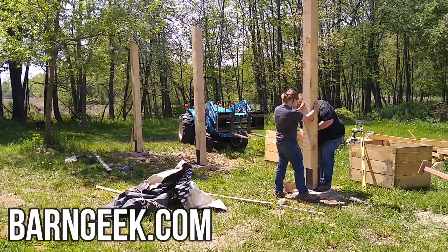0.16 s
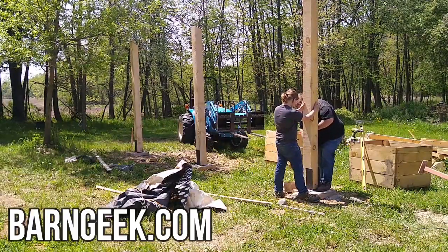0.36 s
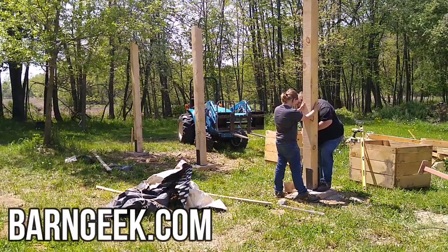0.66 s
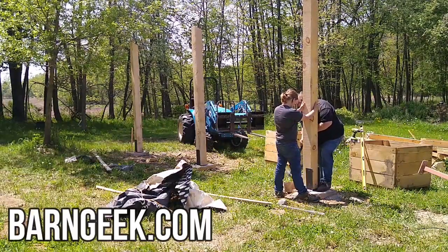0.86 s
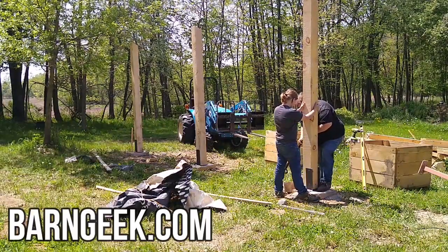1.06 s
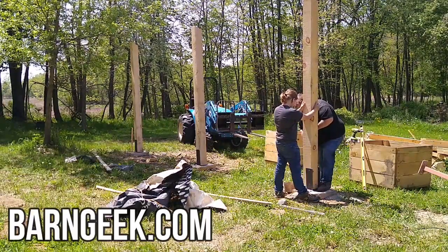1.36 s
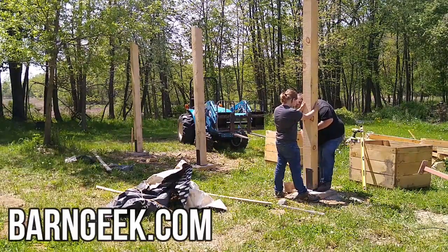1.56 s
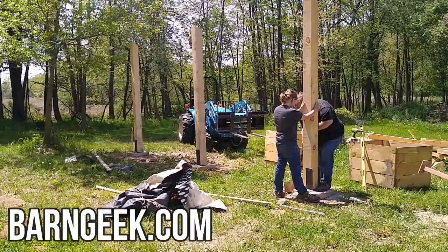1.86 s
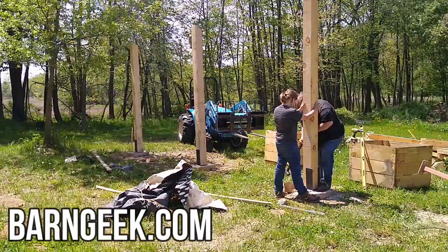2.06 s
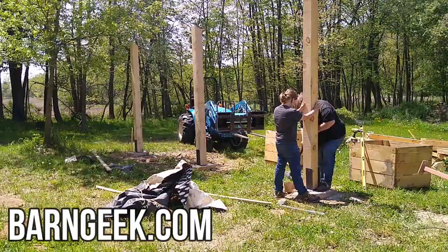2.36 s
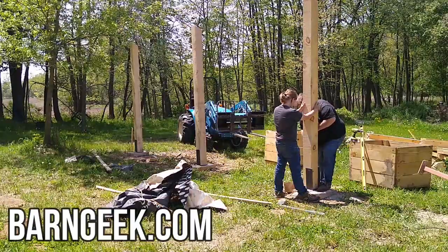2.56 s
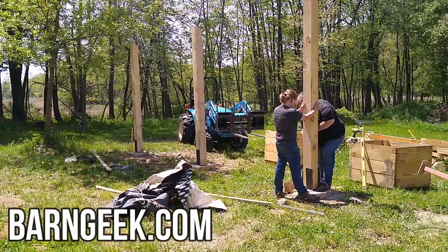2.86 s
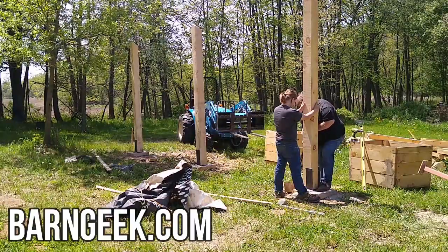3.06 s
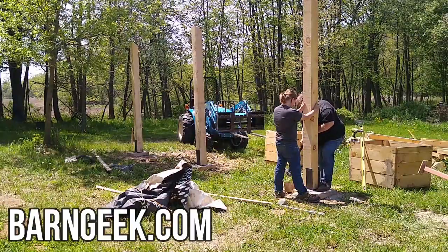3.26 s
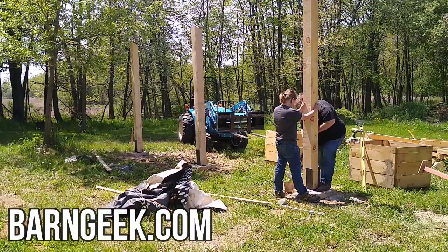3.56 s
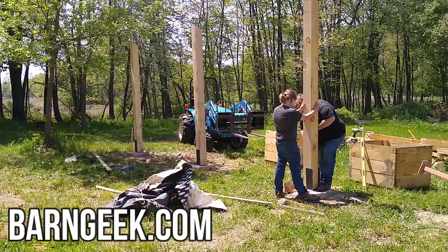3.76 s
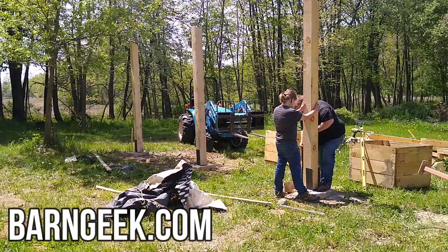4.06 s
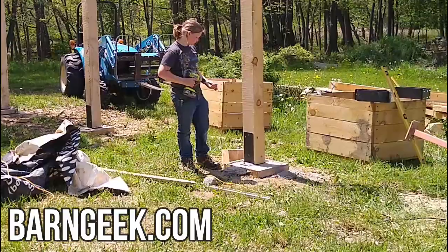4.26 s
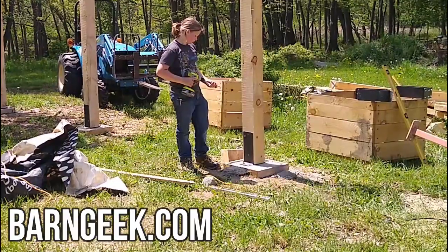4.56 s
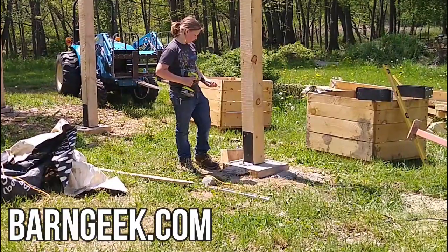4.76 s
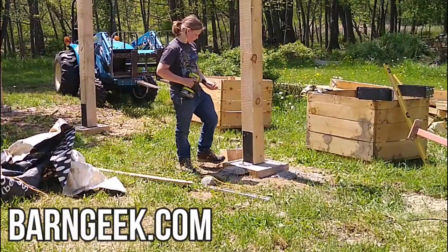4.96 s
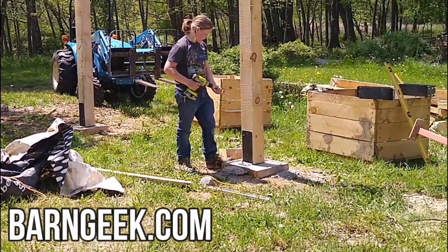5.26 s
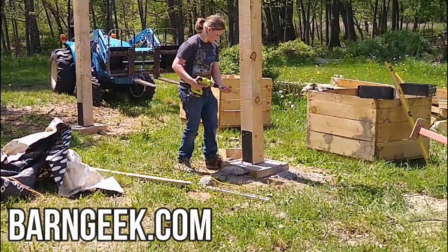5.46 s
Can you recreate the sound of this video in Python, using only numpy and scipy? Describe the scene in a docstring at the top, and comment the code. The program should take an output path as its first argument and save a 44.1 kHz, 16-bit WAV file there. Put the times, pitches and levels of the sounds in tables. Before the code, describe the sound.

Four loud, single hammer knocks on a thick wooden post, evenly spaced, each short and hard with a woody ring, bright steel edge and scattered woodland reverberation. Between them are faint wind, small gusts, a soft footfall or two and barely audible bird twitters. Just after four seconds an edit drops the hammering tail and breeze; quiet steady air remains, with repeated high bird phrases, lower rising whistles and tiny grass rustles, heard in open stereo.

```python
"""Hammering on a timber post in a clearing

Four steel blows excite post modes, dense timber modes, steel clusters and a noisy contact; scattered
paths return them from ground, lumber and trees, and a low boom lingers. Wind is coloured noise with gusts.
A cut at 4.205 s replaces hammering and breeze with calmer air. Birds, mostly after it, sing as gliding
sines; feet are swells of low noise (thuds) and treble noise (grass).
"""
import sys
import numpy as np
from scipy import signal
from scipy.fft import rfft, irfft, next_fast_len
from scipy.io import wavfile
from scipy.ndimage import map_coordinates

SR = 44100
rng = np.random.default_rng(int(sys.argv[2]) if len(sys.argv) > 2 else 0)


def master(y):
    """Save y as 16-bit WAV."""
    cut = np.clip(np.atleast_2d(y).T, -1, 1)
    pcm = np.round(cut * 32767)  # scale
    wavfile.write(sys.argv[1], SR, pcm.astype(np.int16))


N = 248283  # length in samples
CUT_S, TOP_HZ = 4.205, 16000  # moment of the cut; band limit of the microphone

# Spectra of the air. Each row: frequency in Hz, relative density in dB per Hz.
RUMBLE_SPECTRUM = [(20, -28), (35, -17), (53, 5.5), (75, -4), (100, -5.5), (150, -19.5), (300, -37),
                   (800, -72)]
BUFFET_SPECTRUM = [(25, -32), (52, 2.5), (80, -3), (130, -8.5), (270, -32), (1000, -72.5)]
BREEZE_SPECTRUM = [(76, -35.5), (130, -9.5), (176, -13), (263, -10.5), (780, -12.5), (1610, -17.5),
                   (3750, -28), (5390, -32), (5850, -34), (7600, -38.5), (14800, -36.5), (16000, -50)]
CALM_SPECTRUM = [(70, -32), (130, -6.5), (500, -8.5), (1220, -16), (2140, -15), (3260, -16.5), (6200, -24),
                 (8200, -27), (12500, -24.5), (15800, -24.5)]
# Likeness of the two channels in diffuse sound. Each row: frequency in Hz, correlation from -1 to 1.
LEFT_RIGHT_LIKENESS = [(60, 0.33), (130, 0.27), (290, 0.94), (640, 0.22), (1400, -0.21), (3000, 0)]
# Gusts that buffet the microphone. Each row: centre in seconds, level in dB, length in seconds.
GUSTS = [(0.11, -53.5, 0.088), (1.032, -52.5, 0.065), (1.175, -49.5, 0.062)]
# Wind slackens steadily up to the cut and stays low after it.
WIND_DB, SLACKEN_DB_PER_S, CALM_WIND_DB = -55, 1.3, -69.5
BREEZE_DB, BREEZE_FALL_DB_PER_S, GUST_STIR_DB = -65.5, .5, 2.5  # a gust stirs the foliage

# Thuds of feet. Each row: centre in seconds, relative level in dB, length in seconds, top in Hz.
FOOT_THUDS = [(1.212, -47.5, 0.0054, 242), (2.024, -51, 0.011, 165), (4.722, -61, 0.0094, 300),
              (4.739, -66, 0.025, 950), (5.059, -55.5, 0.015, 78.4)]
# Grass brushed by boots. Each row: centre in seconds, relative level in dB, length in seconds.
GRASS_SWISHES = [(1.188, -81, 0.07), (4.434, -77.5, 0.055), (4.584, -74, 0.033), (4.718, -71.5, 0.027),
                 (4.709, -68, 0.0042), (5.267, -64.5, 0.0014), (5.293, -75, 0.016)]
# Spectrum of brushed grass. Each row: frequency in Hz, relative density in dB per Hz.
GRASS_SPECTRUM = [(800, -21), (3000, 0.5), (6000, 1), (9000, -5), (12000, 9.5), (16000, -5.5)]

# Notes of each bird call. Each row: delay into the call in seconds, length in seconds, start in Hz,
# end in Hz, bend of the glide, loudest point from 0 to 1, relative level in dB.
PHRASE_NOTES = [(0, .014, 5800, 8100, 0.54, 0.3, -11), (.04, .044, 8050, 5100, -1.3, 0.79, 4),
                (.095, .038, 4600, 3480, -1.2, .5, -3)]
CHIP_NOTES = [(0.0007, 0.022, 4600, 3900, 1.8, .45, 0)]
FALL_NOTES = [(0, .035, 5550, 3850, -.8, 0.23, 0)]
TWITTER_NOTES = [(0, .03, 5530, 4497, 7.5, .45, 0), (.088, .024, 4000, 5000, -2.5, .6, -1)]
RISE_NOTES = [(0, .07, 1640, 3500, 3.2, 0.85, 0)]
WHISTLE_NOTES = [(0, 0.052, 2260, 2150, -2, .2, 0.0051)]
# Scattered calls. Each row: start in seconds, relative level in dB.
CHIP_CALLS = [(4.355, -81), (4.39, -79), (4.428, -74), (4.872, -78), (4.907, -80), (5.614, -73)]
FALL_CALLS = [(4.255, -78), (4.366, -78), (4.588, -79), (4.815, -77)]
TWITTER_CALLS = [(2.162, -76), (2.523, -74.5)]
WHISTLE_CALLS = [(4.201, -73)]
# Runs of the high bird's phrase and the low bird's rising note. Each entry: start in seconds.
PHRASE_STARTS = [4.215, 4.389, 4.572, 4.767, 4.950, 5.127, 5.303, 5.479]
RISE_STARTS = [4.412, 4.597, 4.759, 4.917, 5.078, 5.235, 5.382, 5.539]
PHRASE_DB, PHRASE_SOFTER_DB = -68.5, 13  # full voice; how much softer the run begins
RISE_DB, RISE_SOFTER_DB = -73, 2.5
SWELL_S = 0.36  # time constant of the growth to full voice
WAVER, FLUTTER_DB = 0.011, 3.5  # unsteadiness of pitch (fraction) and of level
NOTE_FULLNESS = 0.59  # exponent of a note's rise and fall

# Hammer blows. Each row: start in seconds, level in dB, relative steel level in dB, relative contact tick
# level in dB, brightness in dB per octave, frequencies in Hz favoured and starved by the spot that is hit.
BLOWS = [(.415, -1.84, -4, -9.5, -0.13, 1060, 361), (1.5653, -0.6, -1, -5, 0.36, 1400, 390.3),
         (2.700, -0.34, -3, 3, 0, 500, 794), (3.879, -1.3, 0, -10, 0.67, 735, 251.6)]
# Modes of the post. Each row: frequency in Hz, relative level in dB, T60 in seconds.
POST_MODES = [(131.2, -20.5, 0.16), (198.4, -35, 0.22), (229.6, -21.5, .13), (253.8, -17.5, .16),
              (363, -31.5, .11), (388.1, -21.5, .15), (461, -22, 0.088), (479.6, -34.5, 0.16),
              (523, -23, 0.12), (569, -38, 0.14), (670, -35, .09), (730.5, -26, 0.12), (850, -31.5, 0.16),
              (965, -34, 0.15), (1082, -33.5, 0.12), (1327, -29, 0.092), (1402, -34, 0.1),
              (1593, -33.5, 0.11), (1723.6, -28, .09), (2037, -31.5, 0.055), (2140, -45, 0.32),
              (2630, -35, 0.12), (3280, -44, 0.11), (3330, -36.5, 0.12)]
# Close modes in the struck steel. Each row: centre in Hz, width in Hz, relative level in dB, T60 in seconds.
STEEL_CLUSTERS = [(4400, 270, -52, .1), (5874, 100, -44.5, .2), (6760, 310, -49, .12),
                  (11200, 700, -47, 0.2), (11700, 660, -54, 0.12), (12500, 450, -42.5, .1),
                  (14200, 760, -40, .08)]
# Spectra of the blow: close, weak timber modes, crack, contact tick and lingering boom.
# Each row: frequency in Hz, relative density in dB per Hz.
TIMBER_SPECTRUM = [(80, -26), (200, -7), (310, -14), (500, 6), (1100, -3), (1900, -7), (3400, -19),
                   (4800, -23.5), (6500, -23), (9000, -35), (12500, -26), (14500, -27.5), (16000, -34)]
CRACK_SPECTRUM = [(350, -32), (1000, -9), (2200, -0.5), (3500, 1), (5000, -9), (8000, -14), (12500, -27),
                  (14500, -16.5), (16000, -27.5)]
TICK_SPECTRUM = [(4000, -27.5), (7500, -16), (9000, -2), (12500, 1), (15000, -8.5)]
BOOM_SPECTRUM = [(25, -27.5), (50, -0.5), (80, -7), (130, -20), (300, -56)]
# Decay of timber and of the echo from the trees. Each row: frequency in Hz, T60 in seconds.
TIMBER_DECAY = [(100, 0.24), (700, 0.16), (2000, 0.16), (5000, .19), (12000, 0.13)]
TREE_DECAY = [(100, 0.77), (900, 0.59), (3000, 0.61), (6000, 0.54), (12000, 0.53)]
# Returns from ground and lumber, then from trees. Each row: frequency in Hz, relative level in dB.
NEARBY_RETURN = [(60, -12.5), (150, -21), (500, -3), (1500, -11), (8000, -5.5)]
TREE_RETURN = [(60, 3.5), (130, -23), (260, -19), (500, -17.5), (850, -12), (1300, -17.5), (2500, -13.5),
               (4500, -11), (6000, -14.5), (11000, -18.5), (15000, -25)]
BOOM_DB, BOOM_RISE_S, BOOM_DECAY_S = -48, .04, .17  # level relative to the blow


def amp(db):
    """Level is logarithmic: 20 dB is a factor of ten in amplitude."""
    return 10 ** (np.asarray(db) / 20)


def unit(x):
    """Normalisation by root mean square gives a signal unit mean power."""
    return x / np.sqrt(np.mean(x ** 2) + 1e-20)


def along(points, hz):
    """Interpolation on logarithmic frequency reads a curve of (Hz, value) points."""
    f, v = np.transpose(points)
    return np.interp(np.log(hz + 1), np.log(f + 1), v)


def wobble(rate):
    """Spline interpolation of random knots, rate per second, yields a smooth fluctuation."""
    knots = rng.standard_normal(int(N * rate / SR) + 4)
    return map_coordinates(knots, [np.arange(N) * rate / SR])


def filtered(x, response):
    """Linear filtering is multiplication by a complex response in frequency."""
    n = x.shape[-1]
    m = next_fast_len(n + SR // 4)
    return irfft(rfft(x, m) * response(np.fft.rfftfreq(m, 1 / SR)), m)[..., :n]


def add(track, s, sound):
    """Superposition: a sound adds linearly to the track from time s on."""
    part = track[..., max(round(s * SR), 0):][..., :sound.shape[-1]]
    part += sound[..., :part.shape[-1]]


def noise(spectrum, size):
    """Spectral shaping of white noise gives coloured noise of unit rms."""
    white = rng.standard_normal(size)
    return unit(filtered(white, lambda hz: amp(along(spectrum, hz))))


def diffuse(spectrum, size):
    """Weighting of independent mid and side noise sets the interchannel correlation of a diffuse field."""
    def mid_side(hz):
        angle = np.arccos(np.clip(along(LEFT_RIGHT_LIKENESS, hz), -1, 1)) / 2
        return np.array([np.cos(angle), np.sin(angle)])

    mid, side = filtered(noise(spectrum, (2, size)), mid_side)
    return unit(np.array([mid + side, mid - side]))


def dying(x, t60s):
    """Frequency-dependent damping: each band falls 60 dB in its own T60."""
    hz, t, z = signal.stft(x, SR, nperseg=256)
    decay = amp(-60 * t / along(t60s, hz)[:, None])
    return signal.istft(z * decay, SR)[1][..., :x.shape[-1]]


def burst(t, attack, decay):
    """Exponential build-up and relaxation shape a short burst."""
    return (1 - np.exp(-t / attack)) * np.exp(-t / decay)


def swell(s, db, length):
    """A Gaussian envelope of standard deviation length rises and passes about time s."""
    t = np.arange(N) / SR
    return amp(db) * np.exp(-.5 * ((t - s) / length) ** 2)


def placed(x, lag_ms, pan_db):
    """Interaural cues: the left port hears x lag_ms later and pan_db louder than the right."""
    ports = np.array([[.5], [-.5]])
    delay = lambda hz: np.exp(-2j * np.pi * hz * ports * lag_ms / 10 ** 3)
    return amp(pan_db * ports) * filtered(x, delay)


def echo(x, paths, colour):
    """Scattering is convolution with many delayed paths, coloured by the surfaces that return them."""
    paths = paths / np.linalg.norm(paths[0])
    paths = filtered(paths, lambda hz: amp(along(colour, hz)))
    return signal.fftconvolve(x[None], paths, axes=1)[:, :len(x)]


def gust_strength():
    """Gusts superpose as separate Gaussian swells of strength."""
    return sum(swell(*row) for row in GUSTS)


def wind():
    """Pressure fluctuation at the microphone: lumpy low rumble, with brighter, rougher buffeting in gusts."""
    t = np.arange(N) / SR
    level_db = np.where(t < CUT_S, WIND_DB - SLACKEN_DB_PER_S * t, CALM_WIND_DB)
    rumble = unit(diffuse(RUMBLE_SPECTRUM, N) * amp(2 * wobble(29)))
    buffet = unit(diffuse(BUFFET_SPECTRUM, N) * amp(3.4 * wobble(60)))
    return amp(level_db) * rumble + gust_strength() * buffet


def breeze():
    """Foliage noise is a diffuse field that weakens slowly and is stirred up by gusts."""
    t, gusts = np.arange(N) / SR, gust_strength()
    level_db = BREEZE_DB - BREEZE_FALL_DB_PER_S * t + GUST_STIR_DB * gusts / gusts.max()
    return amp(level_db + 1.3 * wobble(13)) * diffuse(BREEZE_SPECTRUM, N)


def calm_air():
    """Calm air is a nearly stationary diffuse field."""
    return amp(-73.5 + 0.38 * wobble(5.0)) * diffuse(CALM_SPECTRUM, N)


def feet():
    """Impact on soft ground gives low-passed thuds; friction in grass gives fluctuating treble noise."""
    thuds = np.zeros(N)
    for s, db, length, top in FOOT_THUDS:
        spectrum = [(25, -25), (55, 0), (top, -3), (2 * top, -30), (8 * top, -80)]
        thuds += swell(s, db, length) * noise(spectrum, N)
    rustle = unit(noise(GRASS_SPECTRUM, N) * amp(3 * wobble(600)))
    grass = sum(swell(*row) for row in GRASS_SWISHES) * rustle
    return placed(thuds, lag_ms=0, pan_db=4.0) + placed(grass, lag_ms=-0.044, pan_db=6.0)


def note(length, start_hz, end_hz, bend, loudest):
    """Exponential glide of frequency: positive bend speeds it up, negative lets it settle."""
    u = np.linspace(0, 1, int(length * SR))
    hz = start_hz + (end_hz - start_hz) * np.expm1(bend * u) / np.expm1(bend)
    envelope = np.interp(u, [0, np.clip(loudest, .05, .95), 1], [0, 1, 0]) ** NOTE_FULLNESS
    return hz, envelope


def crescendo(times, full_db, softer_db):
    """Exponential approach of level: a run of (s, dB) calls starts softly and grows to full voice."""
    return [(s, full_db - softer_db * np.exp((times[0] - s) / SWELL_S)) for s in times]


def song(notes, calls):
    """Phase is the integral of frequency; slow random modulation varies pitch and strength."""
    track = np.zeros(N)
    waver, flutter_db = 1 + WAVER * wobble(250), FLUTTER_DB * wobble(110)
    for delay, *glide, note_db in notes:
        hz, envelope = note(*glide)
        for s, db in calls:
            now = (round((s + delay) * SR) + np.arange(len(hz))) % N
            phase = 2 * np.pi * np.cumsum(hz * waver[now]) / SR
            tone = np.sqrt(2) * np.sin(phase)
            add(track, s + delay, amp(db + note_db + flutter_db[now]) * envelope * tone)
    return track


def birds():
    """Reverberation: the wood smears notes from birds in different trees, with shorter decay in the treble."""
    high = song(PHRASE_NOTES, crescendo(PHRASE_STARTS, PHRASE_DB, PHRASE_SOFTER_DB))
    high += song(CHIP_NOTES, CHIP_CALLS)
    high += song(FALL_NOTES, FALL_CALLS)
    high += song(TWITTER_NOTES, TWITTER_CALLS)
    low = song(RISE_NOTES, crescendo(RISE_STARTS, RISE_DB, RISE_SOFTER_DB))
    low += song(WHISTLE_NOTES, WHISTLE_CALLS)
    tail = dying(rng.standard_normal((2, SR // 2)), [(2000, 0.55), (7000, .24)])
    wet = echo(high + low, tail, [(2000, -5.5), (4000, -4), (7000, -6.0)])
    high_direct = amp(-1.5) * placed(high, lag_ms=-0.287, pan_db=6)
    low_direct = amp(1.0) * placed(low, lag_ms=0.045, pan_db=2)
    return high_direct + low_direct + wet


def boom():
    """Slow low-frequency decay: a faint boom lingers after each blow, in step with its strength."""
    t = np.arange(N) / SR
    level = np.zeros(N)
    for s, db, *_ in BLOWS:
        level += amp(db + BOOM_DB) * burst(np.maximum(t - s, 0), BOOM_RISE_S, BOOM_DECAY_S)
    return level * noise(BOOM_SPECTRUM, N)


def post_ring(t, bright_db, favoured_hz, starved_hz, travel, spot_db):
    """Dispersion of bending waves: low modes arrive later (travel is in seconds at 1 kHz)."""
    hz, db, t60 = np.transpose(POST_MODES)[..., None]
    khz = hz / 10 ** 3
    age = np.maximum(t - travel / np.sqrt(khz), 0)
    # a mode sounds strongly when hit at its belly and weakly when hit at a node
    near = lambda centre: np.exp(-(np.log2(hz / centre) / 0.11) ** 2)
    level = db + spot_db * (near(favoured_hz) - near(starved_hz))
    level = level + bright_db * np.log2(2 * khz)  # tilt about 500 Hz
    level = level + rng.standard_normal(hz.shape)
    return np.sum(amp(level - 60 * age / t60) * np.sin(2 * np.pi * hz * age), axis=0)


def steel_zing(t, steel_db):
    """Close modes merge into resonance bands, each noise under a Lorentzian curve that dies away."""
    zing = np.zeros(SR)
    for centre, width, db, t60 in STEEL_CLUSTERS:
        resonance = lambda hz: 1 / (1 + (2 * (hz - centre) / width) ** 2)
        cluster = unit(filtered(rng.standard_normal(SR), resonance))
        zing += cluster * amp(steel_db + db) * burst(t, attack=.0015, decay=t60 / np.log(1000))
    return zing


def blow(steel_db, tick_db, *spot):
    """Impact excitation: the contact ticks and cracks, the timber rings and the steel zings."""
    t = np.arange(SR) / SR
    post = post_ring(t, *spot, travel=0.000876, spot_db=3.5)
    timber = dying(noise(TIMBER_SPECTRUM, SR), TIMBER_DECAY)
    timber = amp(-22) * timber * (1 - np.exp(-t / .0015))
    crack = amp(-23.0) * noise(CRACK_SPECTRUM, SR) * burst(t, attack=0.0014, decay=0.0038)
    tick = amp(tick_db - 27.5) * noise(TICK_SPECTRUM, SR) * burst(t, attack=.0008, decay=.0013)
    # a slim post radiates almost no deep bass
    no_bass = signal.butter(N=4, Wn=85, btype="high", fs=SR, output="sos")
    return signal.sosfilt(no_bass, post + timber + crack + tick + steel_zing(t, steel_db))


def hammer():
    """Multipath propagation: each blow arrives directly, off ground and lumber, and late from the trunks."""
    track, t = np.zeros((2, N)), np.arange(SR) / SR
    white = [(100, 0), (10000, 0)]
    edge = 1 + .5 * np.exp(-((t - .13) / 0.015) ** 2)  # the edge of the wood throws back one broad slap
    for s, db, *touch in BLOWS:
        direct = amp(db) * blow(*touch)
        front = direct * amp(2) * np.exp(-t / 0.013)  # the far echo mostly carries the sharp front
        nearby = diffuse(white, SR) * burst(t, attack=0.00048, decay=0.012)
        trunks = dying(diffuse(white, SR), TREE_DECAY) * (1 - np.exp(-t / 0.021)) * edge
        add(track, s, placed(direct, lag_ms=.09, pan_db=-0.3))
        add(track, s, echo(direct, nearby, NEARBY_RETURN))
        add(track, s, echo(front, trunks, TREE_RETURN))
    return track


def scene():
    """Superposition of sources: hammering, boom and breeze stop at the cut, where calmer air begins."""
    t = np.arange(N) / SR
    before_cut = breeze() + boom() + hammer()
    return np.where(t < CUT_S, before_cut, calm_air()) + wind() + feet() + birds()


def record(dry):
    """Saturation rounds off the highest peaks; a band limit then removes everything from TOP_HZ up."""
    rounded = dry / (1 + (dry / .33) ** 4) ** (1 / 4)
    return filtered(rounded, lambda hz: hz < TOP_HZ)


dry = scene()
out = record(dry)
master(out)
```